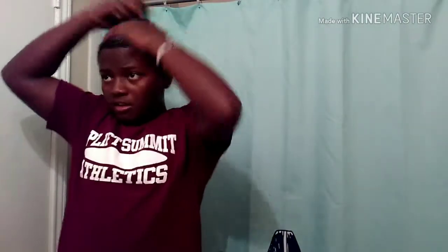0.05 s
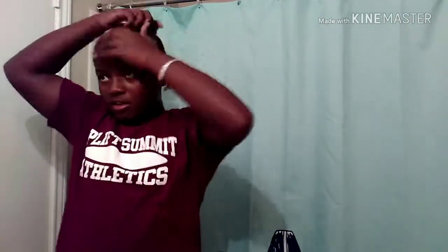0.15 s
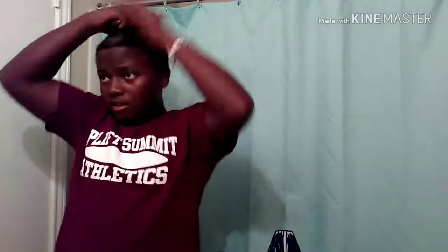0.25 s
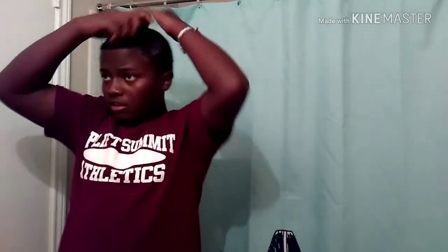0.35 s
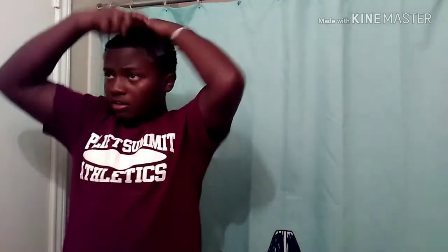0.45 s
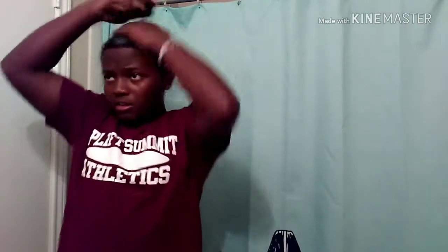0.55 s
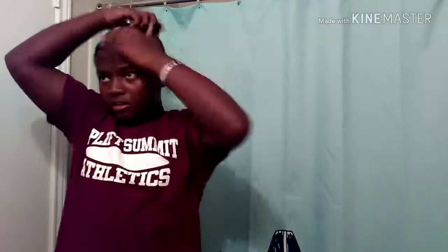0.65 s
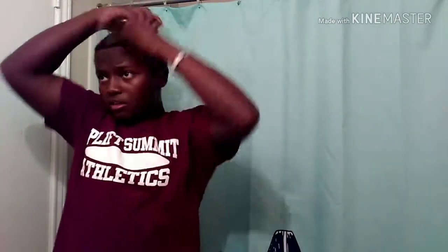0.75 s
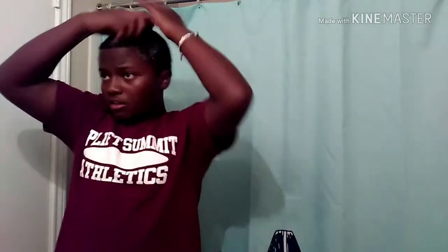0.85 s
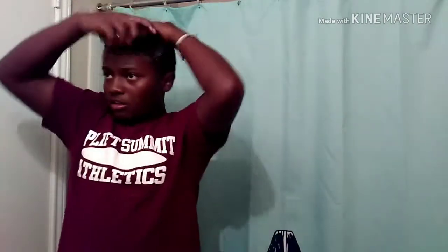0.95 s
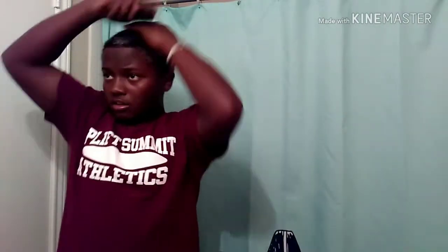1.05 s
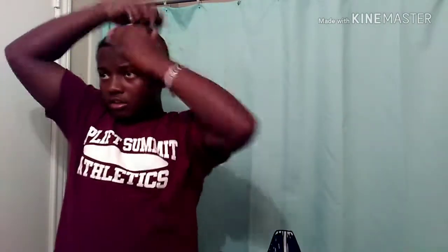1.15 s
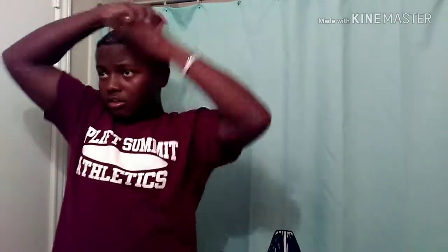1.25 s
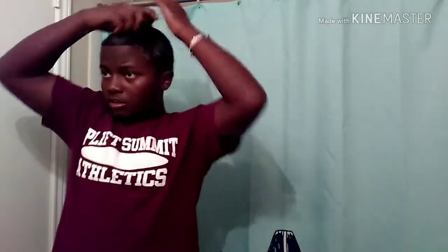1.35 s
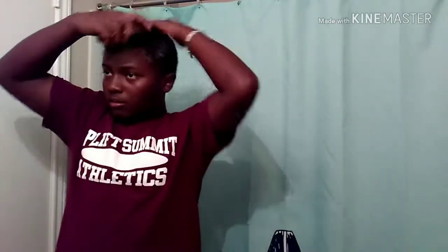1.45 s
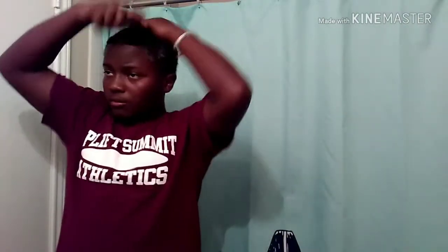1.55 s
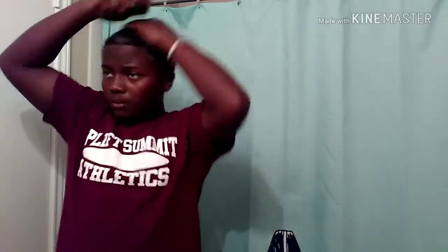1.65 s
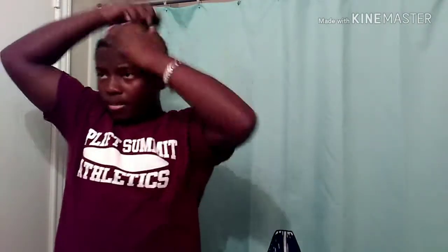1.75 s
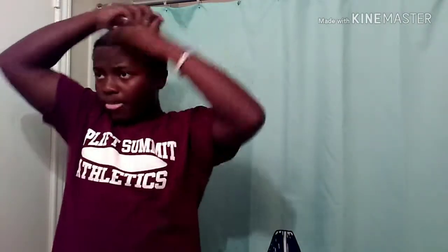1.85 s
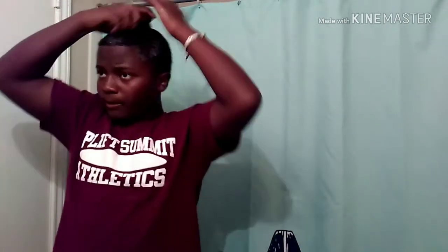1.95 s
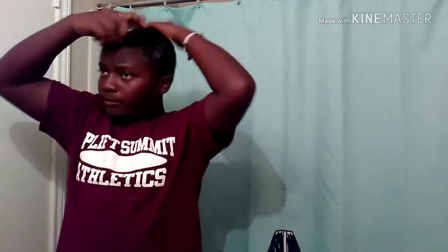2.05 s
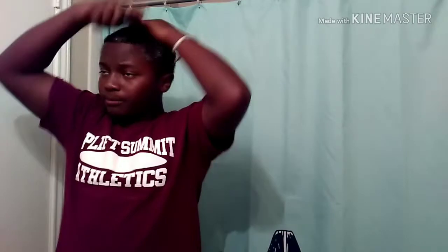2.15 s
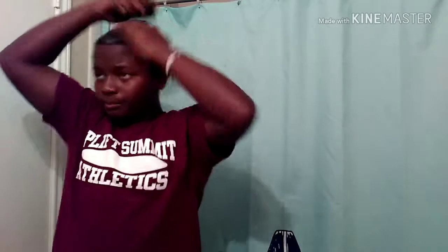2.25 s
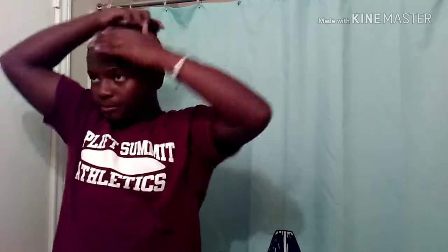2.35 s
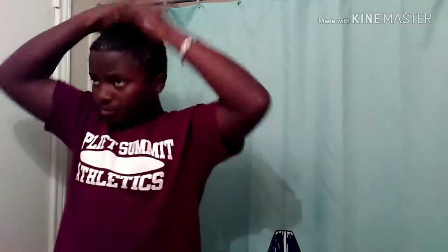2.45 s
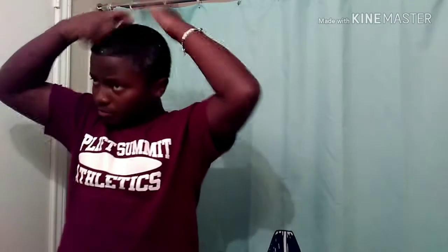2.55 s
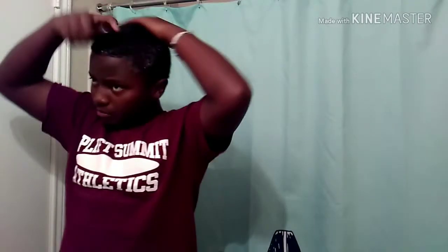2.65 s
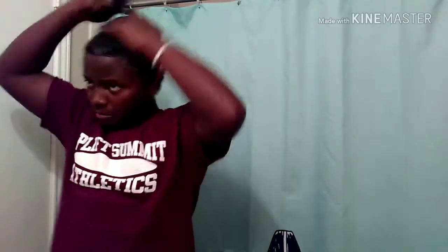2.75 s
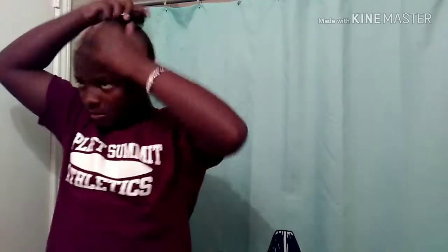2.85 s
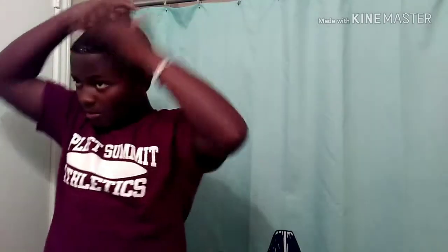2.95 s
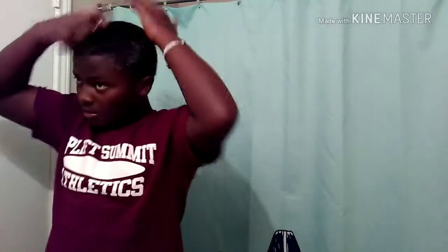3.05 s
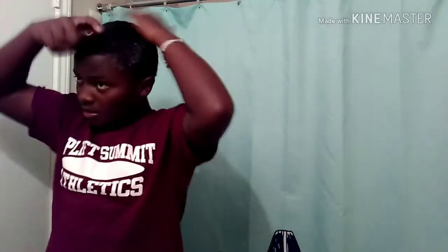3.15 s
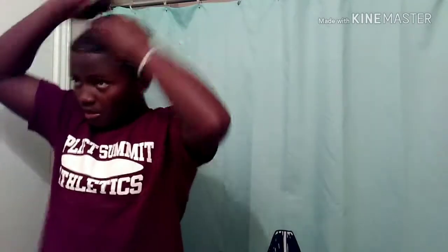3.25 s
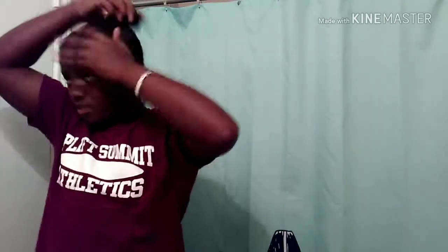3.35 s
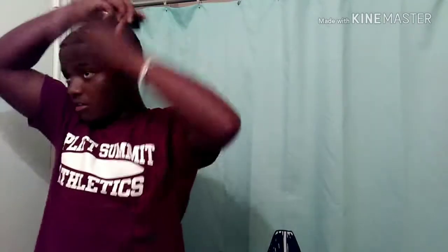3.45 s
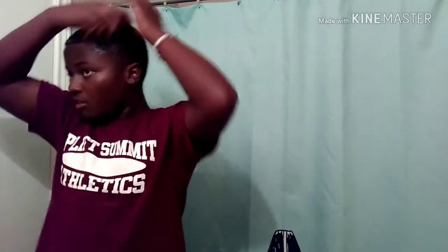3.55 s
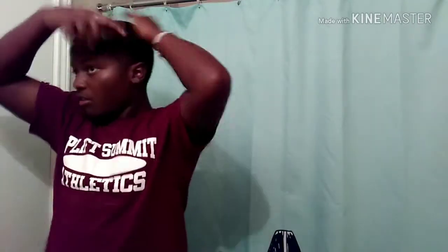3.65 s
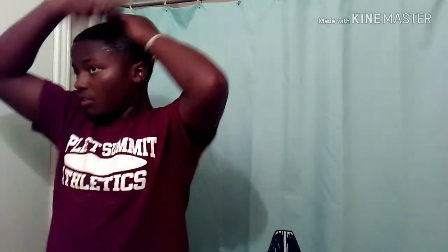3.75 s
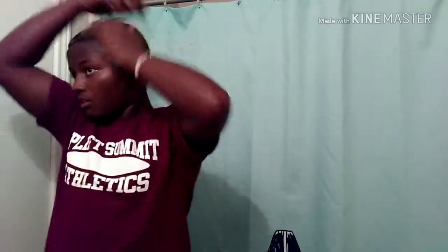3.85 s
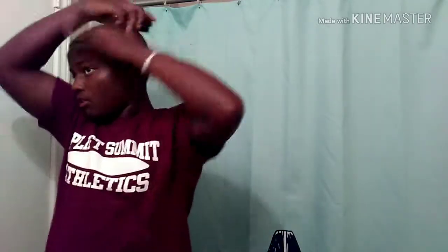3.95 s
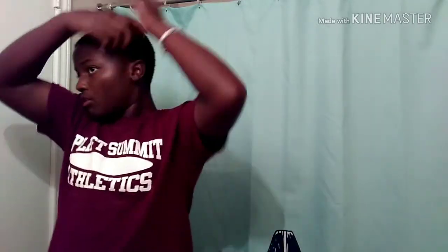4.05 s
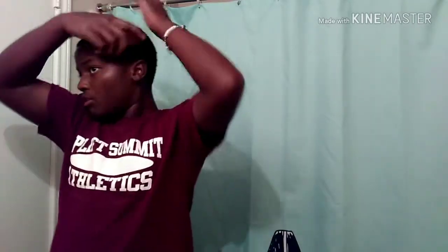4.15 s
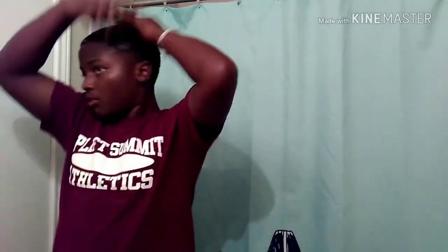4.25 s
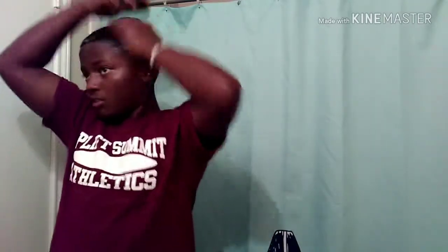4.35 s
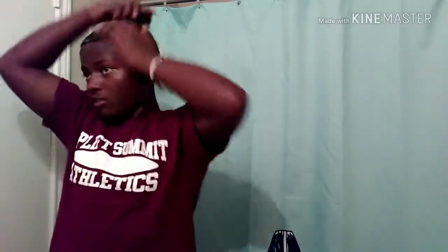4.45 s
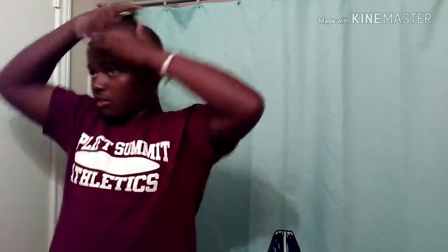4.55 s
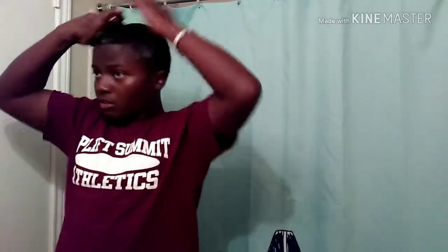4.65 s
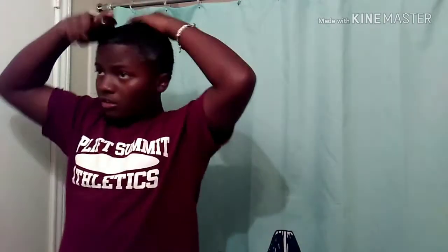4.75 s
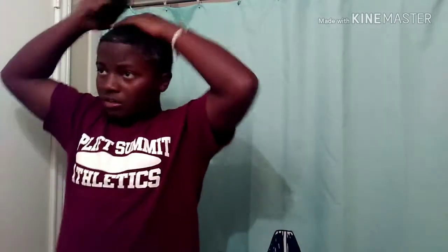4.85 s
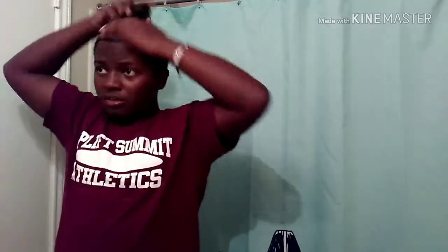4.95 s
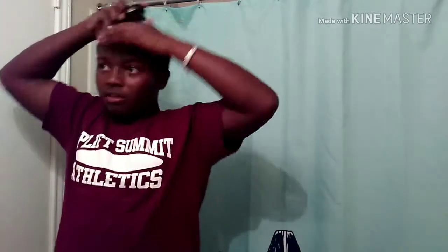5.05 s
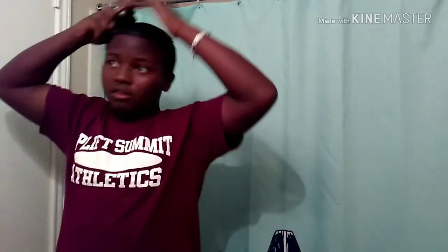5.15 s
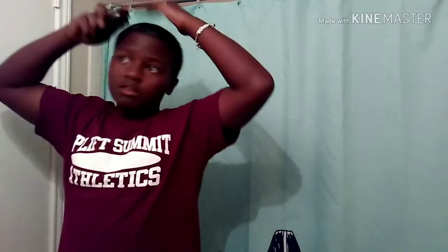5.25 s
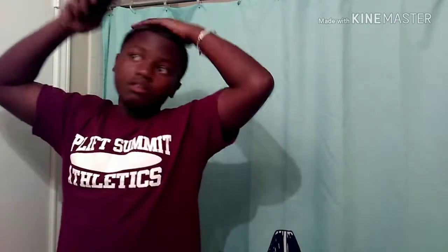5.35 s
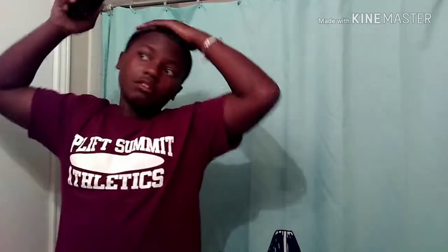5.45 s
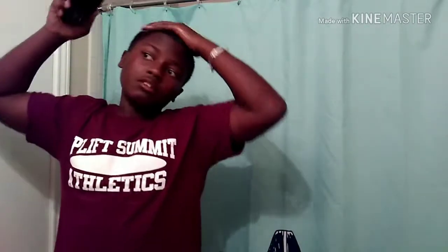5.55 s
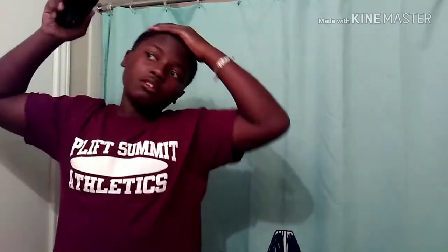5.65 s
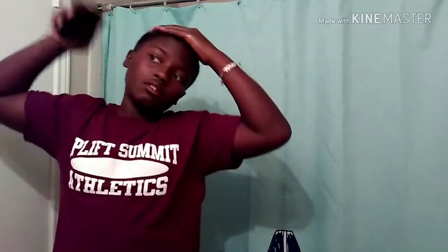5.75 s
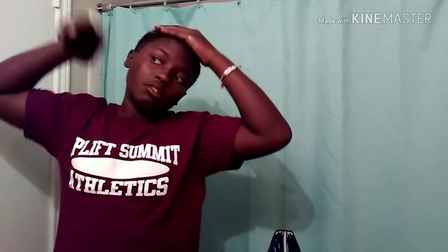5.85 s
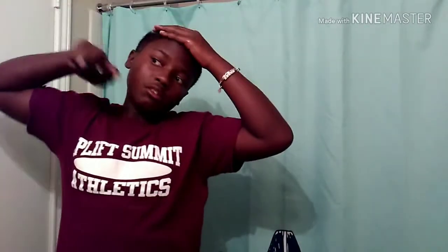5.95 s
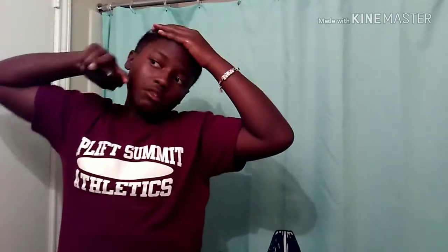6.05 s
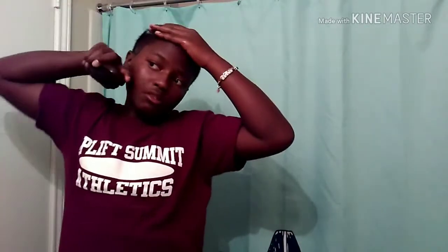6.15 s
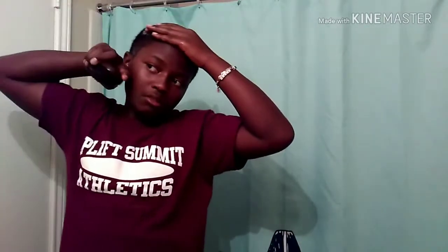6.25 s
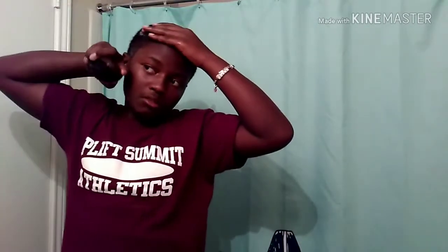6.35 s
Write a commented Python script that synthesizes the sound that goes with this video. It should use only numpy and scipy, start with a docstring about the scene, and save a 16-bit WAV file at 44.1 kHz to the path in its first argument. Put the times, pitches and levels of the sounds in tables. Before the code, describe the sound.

A close stereo pickup in a small, tiled-sounding bathroom with very short echoes; the treble is stronger at left. Soft hand smoothing whispers over short wet hair from 0 to 0.3 s. Then a bristle brush pulls through briskly, at about 0.33, 0.84, 1.4, 1.9, 2.5, 3.0, 3.5, 4.0, 4.6 and 5.2 s. Each pull lasts around a quarter second, a bright dense scratch with fizzy hiss and a firmer midrange rasp that deepens with pressure; the last is shorter. Between pulls the free hand gives shorter, quieter, thinner swishes, fainter after 3.8 s. Tiny hollow scuffs color some strokes, and dull low bumps show faintly, clearest near 0.45, 3.6 and 5.4 s. At 5.6 s a very light palm slide fizzes softly. Arm rustle fades, leaving quiet air and faint low hum until about 6.4 s.

```python
"""Brushing wet hair

A bristle brush is pulled briskly through short wet hair, ten strokes, the free hand smoothing in between.
Thousands of tiny random slips make a bright rasp that deepens with pressure; late on, a palm slides softly.
Filtered noise adds hollow scuffs, and random echoes make a small bathroom around it all.
Soft low bumps, a faint mains hum of two tones, a low steady resonance, room air and a rustle of arms
lie underneath."""
import sys
import numpy as np
from scipy import signal
from scipy.fft import rfft, irfft, next_fast_len
from scipy.io import wavfile

SR = 44100
rng = np.random.default_rng(int(sys.argv[2]) if len(sys.argv) > 2 else 0)


def unload_audio(sound):
    """Save the sound as a 16-bit wav file, at the path given as the first command line argument."""
    columns = np.transpose(np.atleast_2d(sound))
    # keep every value between -1 and 1, then stretch to whole-number steps
    steps = np.round(np.clip(columns, -1, 1) * 32767)
    wavfile.write(sys.argv[1], SR, steps.astype(np.int16))


N = 281602
TIME = np.arange(N) / SR
FFT_SIZE = next_fast_len(N + SR // 4, real=True)
FREQS = np.maximum(np.fft.rfftfreq(FFT_SIZE, 1 / SR), 1)

# sound of wet hair flicking past the bristle tips: hz, relative level_db
HISS_COLOUR = [(2000, -26.5), (4500, -30), (6500, -3), (8000, 1), (10000, -1), (15500, -3.5)]
# sound of bristles combing through the tufts: hz, relative level_db
SCRATCH_COLOUR = [(1200, -41.5), (2300, -36.5), (3100, -7), (4200, 0), (6000, 1), (7500, -1.5),
                  (10000, -28.5), (15500, -23.5)]
# sound of firm contact, bristles dragging on the scalp: hz, relative level_db
RASP_COLOUR = [(300, -1.5), (1000, -9.5), (1400, -0.5), (1900, 0), (2700, -1.5), (3400, -1.5),
               (5000, -29.5), (15000, -37)]
# resonances of the brush: pitch_hz, width_hz, strength_db
BRUSH_RESONANCES = [(1870, 220, 7), (3600, 170, 7)]
SCRATCH_DB = -4   # against the blend of speed and pressure that drives it
SCRATCH_FOLLOWS = 0.18   # share of the scratch that follows pressure rather than speed
HAND_SHADE_DB = (0.8, -4.5)   # head and arm screen the rasp of the free hand: (left, right)


def brushing(hiss_gain_db=-0.37, rasp_gain_db=2.08, deepest_hz=1330, rise_hz_per_db=17,
             snag_db=0.36, snag_hz=25, grip_db=-0.06, grip_hz=25):
    """Faster strokes free more hairs a second; pressure adds scratch, then rasp, and lowers the rasp's edge."""
    level_db, pressure_db, hand_share = strokes()
    snags = snag_db * drift(snag_hz)   # tufts catch and let go
    level_db = level_db + snags
    pressure_db = pressure_db + snags + grip_db * drift(grip_hz)
    per_s = 11000 * from_db(.3 * (level_db - level_db.max()))

    def grains(clump_db, clump_hz, astray):
        """Slips at the changing rate, evened out so that the rate does not change the loudness."""
        return slips(per_s, 1.9, clump_db, clump_hz, astray) / np.sqrt(per_s)

    hiss_grains = grains(clump_db=0.5, clump_hz=218.3, astray=0.44)
    hiss = friction(hiss_grains, response(HISS_COLOUR)[0], level_db + hiss_gain_db)

    scratch_db = SCRATCH_DB + (1 - SCRATCH_FOLLOWS) * level_db + SCRATCH_FOLLOWS * pressure_db
    scratch_grains = grains(clump_db=0.0, clump_hz=148, astray=.25)
    scratch = friction(scratch_grains, response(SCRATCH_COLOUR)[0], scratch_db)

    brush_body = 1
    for hz, width, db in BRUSH_RESONANCES:
        brush_body = brush_body + (from_db(db) - 1) / (1 + 2j * (FREQS - hz) / width)
    rasp_grains = grains(clump_db=-1.0, clump_hz=99.3, astray=.25)
    rasp = friction(rasp_grains, response(RASP_COLOUR)[0] * brush_body, pressure_db + rasp_gain_db)
    below_peak_db = np.minimum(pressure_db.max() - pressure_db, 20)
    rasp = lower_edge(rasp, deepest_hz + rise_hz_per_db * below_peak_db)
    return hiss, scratch + rasp * from_db(np.outer(HAND_SHADE_DB, hand_share))


# pulls of the brush, before the gains in brushing: start_s, length_s, mid-stroke level_db,
# arch_db (how far both ends lie below the middle), lean_db (added from middle to end)
BRUSH_PULLS = [(0.326, 0.21, -39.5, 9.0, 1.5), (0.838, 0.27, -41.0, 9, -3), (1.377, 0.22, -42.0, 2, -0.5),
               (1.919, 0.27, -42.5, 5, -2.5), (2.475, 0.26, -40.5, 9.0, -2.0),
               (3.002, 0.25, -40.0, 10.5, -1.5), (3.513, 0.179, -41.5, 2.0, 0.5),
               (4.022, 0.213, -43.5, 5.5, -1), (4.611, 0.23, -44.5, 2, -3), (5.16, 0.13, -40.5, 3, 1.5)]
# the free hand smooths the hair, before the same gains: start_s, length_s, mid-stroke level_db,
# lean_db, rasp_db (deep rasp against the hiss)
HAND_SMOOTHS = [(0.006, 0.2, -48, 1.5, -19), (0.136, 0.18, -50, 2, -12.0), (0.616, 0.22, -47, -0.5, -21.0),
                (1.139, 0.12, -48.5, 2.0, -15.5), (1.69, 0.13, -49.0, 1.0, -14.5),
                (2.234, 0.172, -49, 2.5, -25.0), (2.84, 0.105, -48.5, -0.5, -18),
                (3.32, 0.085, -47.5, 2, -13.5), (3.886, 0.062, -55.5, 5, -13),
                (4.44, 0.149, -52.5, 3.0, -18.5), (4.981, 0.1, -52.0, 3, -23)]
SMOOTH_ARCH_DB = 1.3   # the hand moves at a more even speed than the brush
PULL_RASP_DB = -13   # rasp of the brush against its hiss at time zero, before the gains in brushing
RASP_EASE_DB_PER_S = 0.27   # the hair lies flatter with every pull, so the rasp eases
RASP_EXTRA_SWING = 0.25   # the rasp needs pressure, so it swells and fades by this share more than the hiss


def strokes():
    """Brush and hand in turn: level of the hiss, level of the rasp, and the hand's share of the rasp."""
    pulls = [(db, PULL_RASP_DB - RASP_EASE_DB_PER_S * start, stroke_db(start, length, arch, lean))
             for start, length, db, arch, lean in BRUSH_PULLS]
    smooths = [(db, rasp, stroke_db(start, length, SMOOTH_ARCH_DB, lean))
               for start, length, db, lean, rasp in HAND_SMOOTHS]
    level_db = together(db + shape for db, _, shape in pulls + smooths)
    swing = 1 + RASP_EXTRA_SWING
    brush_db = together(db + rasp + swing * shape for db, rasp, shape in pulls)
    hand_db = together(db + rasp + swing * shape for db, rasp, shape in smooths)
    pressure_db = together([brush_db, hand_db])
    return level_db, pressure_db, from_db(hand_db - pressure_db) ** 2


ATTACK_DB_PER_S, RELEASE_DB_PER_S = 300, 148   # as brush or hand lands, and as it lifts
LIFT_OFF_S = .13   # this far from a stroke hardly a hair still touches, and the level drops steeply
ROOM_LEAD_S = 0.0063   # strokes begin this much before their listed start


def stroke_db(start, length, arch_db, lean_db):
    """Level of one stroke against its middle: it lands, speeds up and slows in an arch, then lifts."""
    t = TIME + ROOM_LEAD_S - start
    along = np.clip(2 * t / length - 1, -1, 1)   # -1 at the start, 1 at the end
    before, after = np.maximum(-t, 0), np.maximum(t - length, 0)
    off_hair_db = ATTACK_DB_PER_S * before + RELEASE_DB_PER_S * after
    off_hair_db += 20 * ((before + after) / LIFT_OFF_S) ** 4
    return np.maximum(lean_db * along - arch_db * along ** 2 - off_hair_db, -100)


def slips(per_s, spread_db, clump_db, clump_hz, astray=.38):
    """Tiny releases of uneven size, bunched as tufts let go, from all over the brush."""
    born = rng.random(N) < per_s / SR
    uneven_db = spread_db * np.minimum(rng.exponential(1, N), 4)
    size = from_db(uneven_db + clump_db * drift(clump_hz))
    left = born * size * rng.choice([-1, 1], N)
    # the share astray reaches the two microphones out of phase
    right = np.where(rng.random(N) < astray, -left, left)
    return np.array([left, right])


def friction(grains, gain, level_db):
    """Slips coloured by the contact and swelling with the stroke; the level allows for the microphones."""
    heard = np.sqrt(np.mean(np.sum((response(MICROPHONES) * gain) ** 2, axis=0))) / 2
    return colour(grains / np.std(grains), gain / heard) * from_db(level_db)


def lower_edge(x, edge_hz, steepness=8, leak_db=-25, count=5):
    """A steep high-pass whose edge slides; a little of the bass always leaks through."""
    edges = np.linspace(1100, 1900, count)
    place = np.interp(edge_hz, edges, np.arange(count))
    out = 0
    for k, hz in enumerate(edges):
        gain = np.maximum(1 / np.sqrt(1 + (hz / FREQS) ** (2 * steepness)), from_db(leak_db))
        # fade between the two nearest fixed edges
        out = out + colour(x, gain) * np.clip(1 - np.abs(place - k), 0, 1)
    return out


# light slides of the palm: start_s, length_s, mid-stroke level_db, lean_db
PALM_SLIDES = [(3.825, 0.045, -62, 0.5), (5.391, 0.038, -70.5, 3.5), (5.579, 0.23, -64.5, -2.3)]
# sound of skin sliding on wet hair: hz, relative level_db
SKIN_COLOUR = [(1000, -14.5), (3700, -17), (4400, -16), (5400, -7.5), (7000, 0.5), (9500, 2), (12000, 0.5),
               (15500, -4)]


def palm(arch_db=-0.1):
    """A fine, thin fizz of wet hair under the hand, made of many slips of nearly even size."""
    level_db = together(db + stroke_db(start, length, arch_db, lean)
                        for start, length, db, lean in PALM_SLIDES)
    grains = slips(7400, spread_db=0.5, clump_db=1.7, clump_hz=120)
    return friction(grains, response(SKIN_COLOUR)[0], level_db)


# hollow scuffs, where a pocket of air under the hand rings: crest_s,
# fade_s (crest to about a third of its height), pitch_hz, level_db before the gains and the room
HOLLOW_SCUFFS = [(0.385, 0.015, 870, -69.5), (0.393, 0.075, 567, -72.5), (0.983, 0.029, 1090, -68),
                 (1.566, 0.082, 1284, -61), (1.578, 0.047, 504, -71), (2.01, 0.026, 1110, -64.5),
                 (3.242, 0.075, 1820, -61), (4.51, 0.045, 1900, -65.5), (5.006, 0.086, 1405, -69.5),
                 (5.59, 0.032, 4500, -75.5)]
SCUFF_Q = 6.2   # pitch over width, for each of the two passes


def scuffs(gain_db=3.5):
    """Rubbing noise rings an air pocket, giving short hollow colours."""
    out = 0
    for crest, fade, hz, db in HOLLOW_SCUFFS:
        out = out + from_db(db) * swell(crest, fade) * ringing(hz, hz / SCUFF_Q)
    return from_db(gain_db) * out


# soft low bumps: crest_s, fade_s (crest to about a third of its height), pitch_hz,
# tone level_db at the crest, before the left and right gains
LOW_BUMPS = [(0.456, 0.0088, 252, -53.5), (1.295, 0.015, 330, -62), (1.461, 0.013, 329, -67.5),
             (2.019, 0.013, 326, -59.5), (2.246, 0.025, 341, -61.5), (3.371, 0.015, 285, -62.5),
             (3.589, 0.027, 326.6, -52), (5.142, 0.018, 326, -62), (5.362, 0.038, 327.5, -55),
             (5.482, 0.031, 319, -62.5), (5.582, 0.038, 330.5, -62), (6.219, 0.0096, 250, -68),
             (6.253, .009, 320, -67), (6.327, 0.013, 239, -73)]


def bumps(rough_db=-15):
    """Dull, uneven swells of a low tone and a little ringing noise, heard mostly on the left."""
    out, rough = np.zeros(N), from_db(rough_db)
    unrest = ringing(hz=290, width=110)
    for crest, fade, hz, db in LOW_BUMPS:
        tone = np.sin(2 * np.pi * hz * TIME + rng.uniform(0, 2 * np.pi))
        out += from_db(db) * swell(crest, fade) * (tone + rough * unrest)
    return out * np.array([[1.9], [-.35]])   # left, right


def swell(crest, fade):
    """A rounded rise and fall around its crest."""
    return np.exp(-np.minimum(((TIME - crest) / fade) ** 2, 50))


def ringing(hz, width):
    """Rubbing noise passed twice through one resonance; rms 1."""
    b, a = signal.iirpeak(hz, hz / width, fs=SR)
    once = signal.lfilter(b, a, rng.standard_normal(N))
    return rms_one(signal.lfilter(b, a, once))


ROOM_T60_S, ROOM_DB = 0.12, 1   # time for echoes to die by 60 dB; their level against the direct sound


def bathroom(x, spots_per_s, glance, count):
    """Direct sound, dull glances off head and arms, quickly dying wall echoes; hand movement shifts them."""
    t = TIME[:SR // 5]
    place = spots_per_s * TIME + 1.34 * drift(2.43)
    soft = np.hanning(7) / 3   # dulls each glance
    out = 0
    for spot in range(count):
        echoes = rng.standard_normal((2, len(t))) * from_db(-60 * t / ROOM_T60_S) * (t > .002)
        echoes *= from_db(ROOM_DB) / np.sqrt(np.sum(echoes ** 2, axis=1, keepdims=True))
        early = np.zeros_like(echoes)
        delays = rng.integers(SR // 2000, SR // 280, size=(2, 3))   # three a side, in samples
        early[[[0], [1]], delays] = rng.choice([-1, 1], size=(2, 3))
        echoes += glance * signal.lfilter(soft, 1, early)
        echoes[0, 0] += 1   # only the left microphone has a straight path; the right one faces away
        # fade between neighbouring spots, going round in a circle
        away = np.abs((place - spot + count / 2) % count - count / 2)
        near = np.sqrt(np.clip(1 - away, 0, 1))
        out = out + signal.oaconvolve(x * near, echoes, axes=1)[:, :N]
    return out / np.sqrt(1 + from_db(ROOM_DB) ** 2)


# colour of the still room: hz, relative level_db per hertz
AIR_COLOUR = [(30, -8), (60, -12), (120, 1.5), (180, -13), (260, -4), (340, -6.5), (450, -8), (600, -19.5),
              (1200, -17), (2000, -23.5), (5000, -28), (12000, -26.5), (15000, -45)]
# steady low tones, mains hum at 60 and 120 and a resonance at 323: pitch_hz,
# rms level_db before the random drift and the left and right gains
LOW_TONES = [(60, -108.5), (120, -81.5), (323, -105)]


def background(air_db=-82.0, rustle_db=-80, bass_side_db=16.5, bass_edge_hz=230, lumpy_db=5.0):
    """Room air, steady low tones and lumpy arm rustle; the noise's bass is mostly opposite left and right."""
    opposite = np.array([[1], [-1]])
    width = from_db(bass_side_db / (1 + (FREQS / bass_edge_hz) ** 2))

    def wide_noise(gain):
        """Noise shared by both sides plus noise of opposite sign, strongest in the bass."""
        shared = colour(rng.standard_normal(N), gain)
        opposed = colour(rng.standard_normal(N), gain * width)
        return rms_one(shared + opposite * opposed)

    air = from_db(air_db) * wide_noise(response(AIR_COLOUR))
    # the rustle fades away near the end
    moving = from_db(np.interp(TIME, [5.3, 5.9], [0, -25]) + lumpy_db * np.minimum(drift(7.7), 1))
    rustle_colour = response([(30, -7.5), (60, 1.0), (130, 0.5), (200, -7), (270, 3.5),
                              (450, -9.0), (800, -12.5), (2000, -21.5)])   # hz, relative level_db
    rustle = from_db(rustle_db) * moving * wide_noise(rustle_colour)
    tones = 0
    for hz, db in LOW_TONES:
        tone = np.sin(2 * np.pi * hz * TIME + rng.uniform(0, 2 * np.pi))
        tones = tones + from_db(db) * np.sqrt(2) * tone
    # the level of the tones drifts at random and falls 4 dB near the end
    tones = tones * from_db(1.5 * drift(6) + np.interp(TIME, [5.3, 5.9], [0, -4]))
    return air + rustle + tones * (1 - from_db(6.5) * opposite)


def from_db(db):
    """Decibels to gain."""
    return 10 ** (np.asarray(db) / 20)


def together(levels_db):
    """Level of several unrelated sounds at once."""
    return 10 * np.log10(sum(from_db(db) ** 2 for db in levels_db))


def rms_one(x):
    """Scale so that the mean of the channels has rms 1."""
    return x / np.sqrt(np.mean(np.atleast_2d(x).mean(axis=0) ** 2) + 1e-20)


def response(points):
    """Gain at every frequency, one row for each dB column."""
    hz, *columns = np.transpose(points)
    return np.array([from_db(np.interp(np.log(FREQS), np.log(hz), column)) for column in columns])


def colour(x, gain):
    """Filter by a gain per frequency."""
    return irfft(rfft(x, FFT_SIZE) * gain, FFT_SIZE)[..., :N]


def drift(rate_hz):
    """Slow random drift with rms 1."""
    return rms_one(colour(rng.standard_normal(N), 1 / (1 + (FREQS / rate_hz) ** 2)))


# colour of the two microphones: hz, left_db, right_db
MICROPHONES = [(800, -0.5, -4), (1830, -4, -9), (2470, 2, 0.5), (4180, 0, -2.5), (5850, -1.5, -0.5),
               (7880, 0.5, -5), (9090, 5, -6.5), (9760, 8.5, -9.5), (10640, 12.5, -7), (11570, 10, -4.5),
               (12800, 4, -28), (14350, 1.5, -9)]


def scene():
    """Brush and palm in the bathroom, over its quiet background."""
    hiss, scrape = brushing()
    # the short waves of the hiss change their echo pattern with the smallest move, the scrape more slowly
    bright = bathroom(hiss + palm(), spots_per_s=35, glance=0.51, count=7)
    body = from_db(-3.0) * bathroom(scrape + scuffs(), spots_per_s=10, glance=0.99, count=15)
    return colour(bright + body, response(MICROPHONES)) + bumps() + background()


CUTOFF_HZ = 15600


def record(dry):
    """The treble is cut steeply above the cutoff."""
    return colour(dry, 1 / np.sqrt(1 + (FREQS / CUTOFF_HZ) ** 700))


dry = scene()
out = record(dry)
unload_audio(out)
```